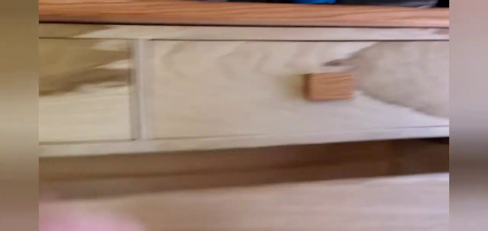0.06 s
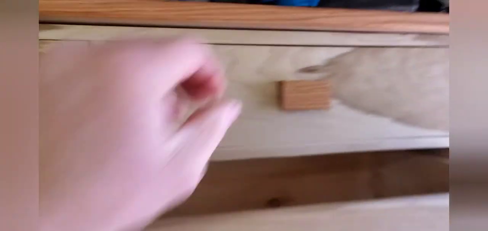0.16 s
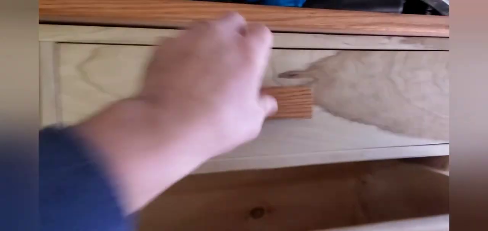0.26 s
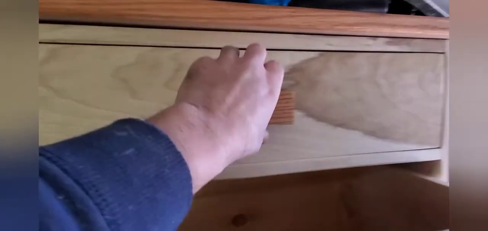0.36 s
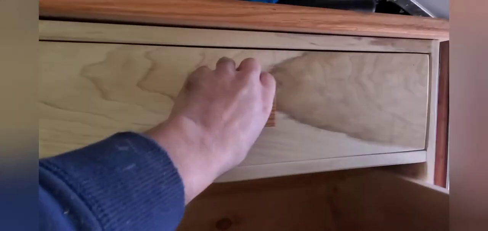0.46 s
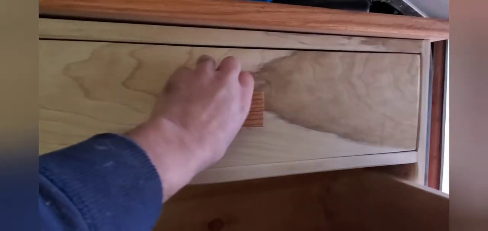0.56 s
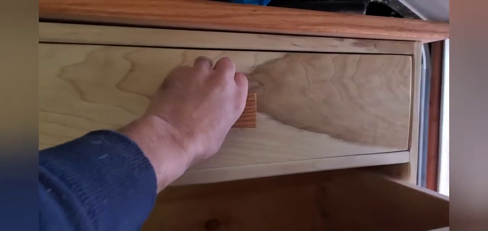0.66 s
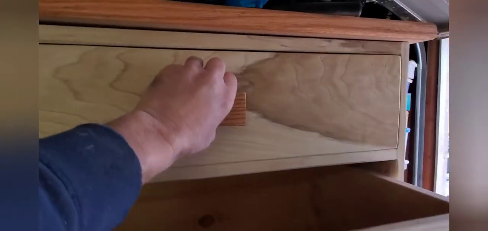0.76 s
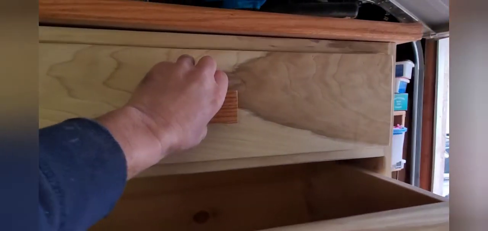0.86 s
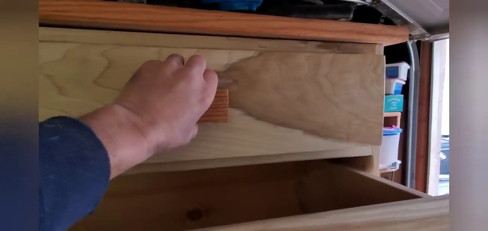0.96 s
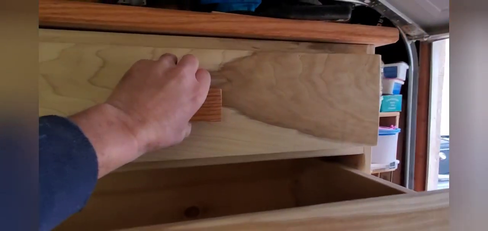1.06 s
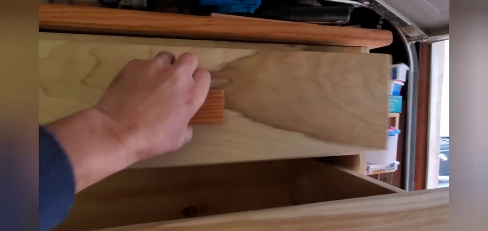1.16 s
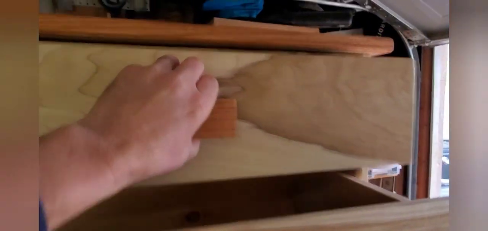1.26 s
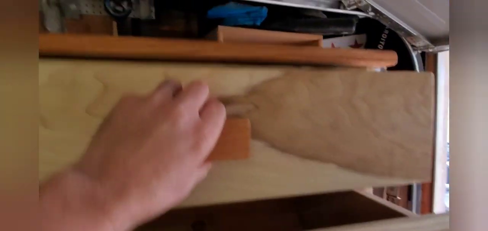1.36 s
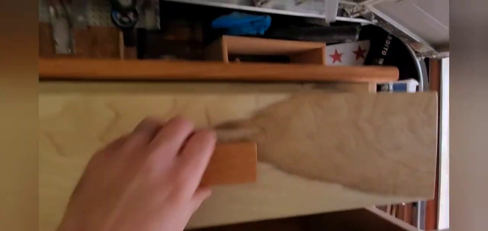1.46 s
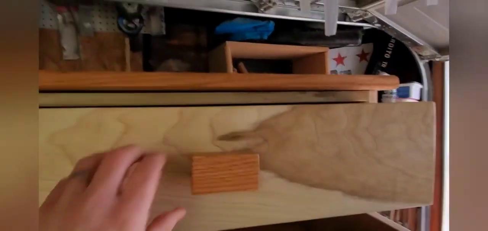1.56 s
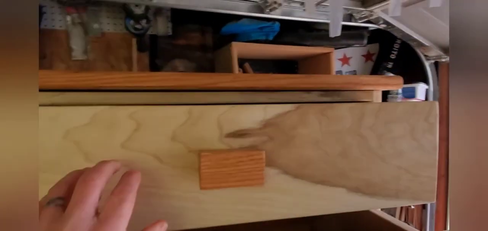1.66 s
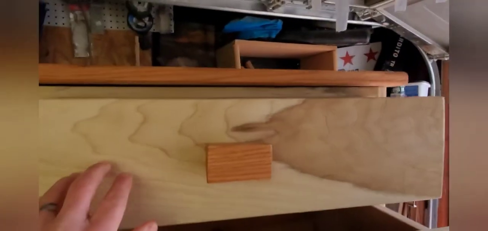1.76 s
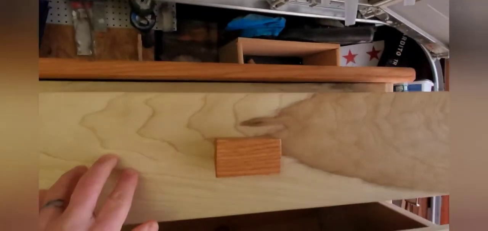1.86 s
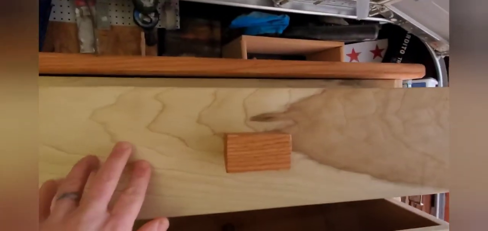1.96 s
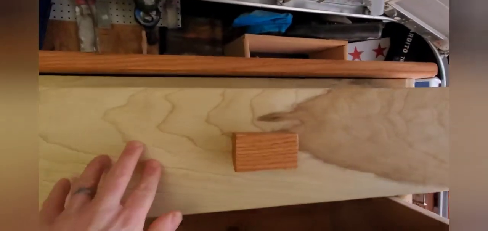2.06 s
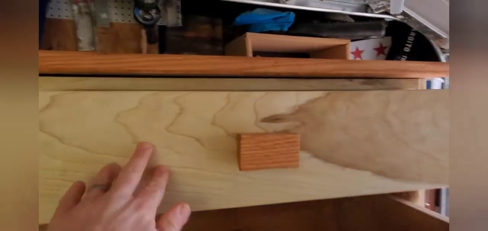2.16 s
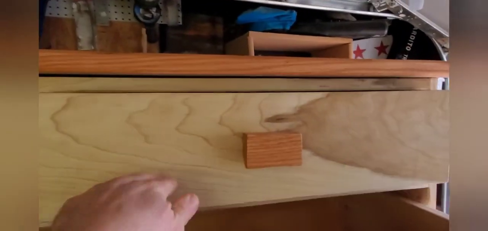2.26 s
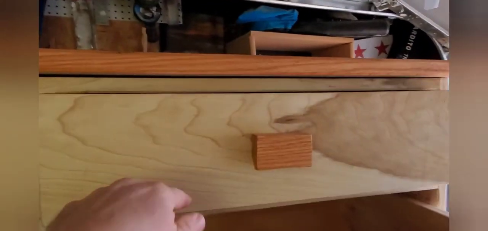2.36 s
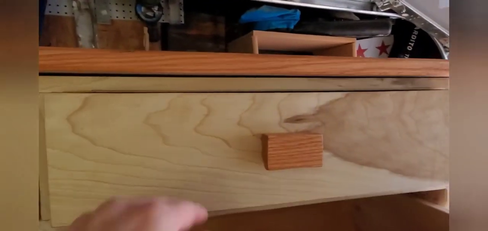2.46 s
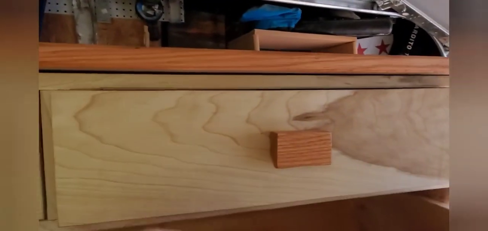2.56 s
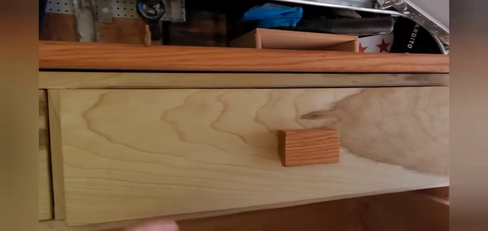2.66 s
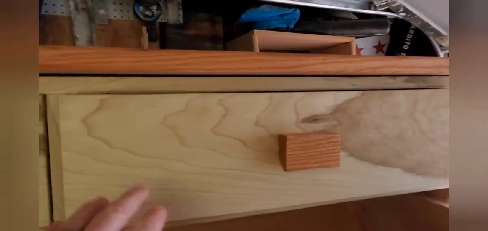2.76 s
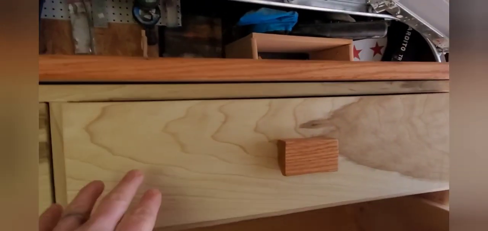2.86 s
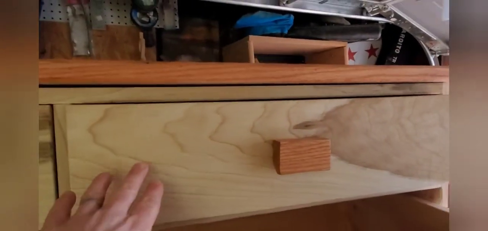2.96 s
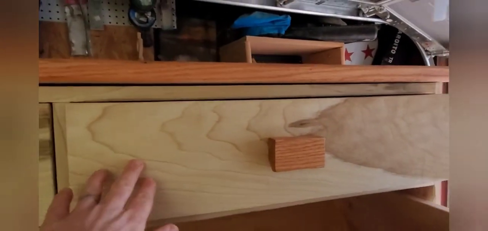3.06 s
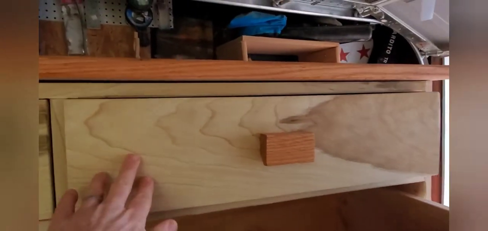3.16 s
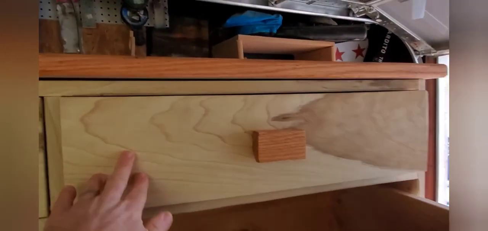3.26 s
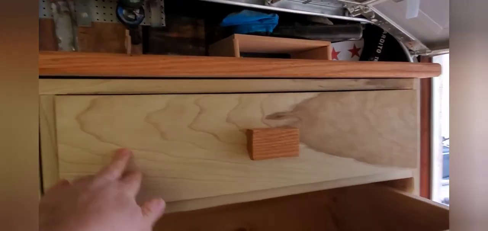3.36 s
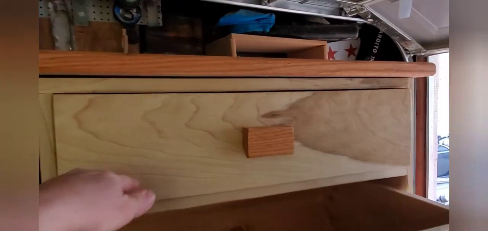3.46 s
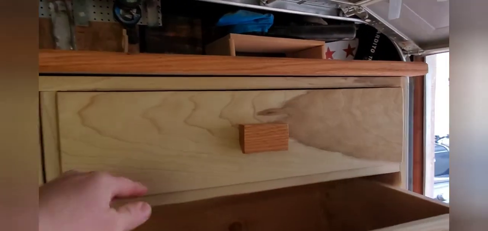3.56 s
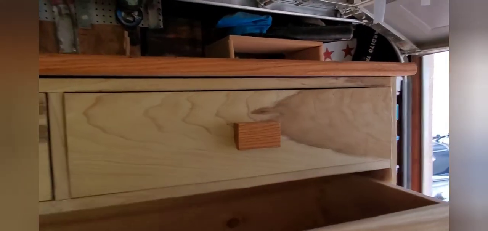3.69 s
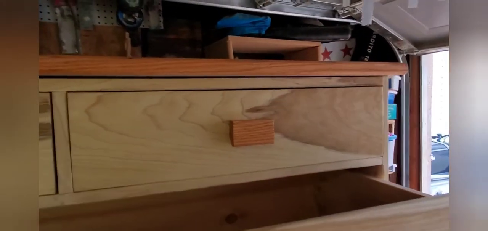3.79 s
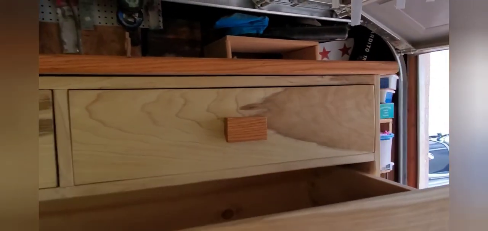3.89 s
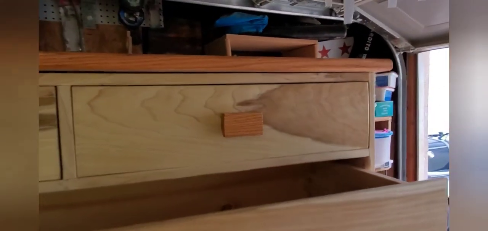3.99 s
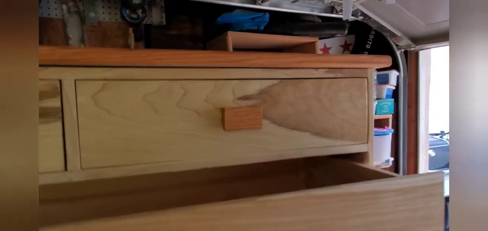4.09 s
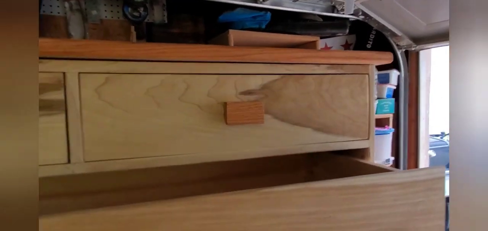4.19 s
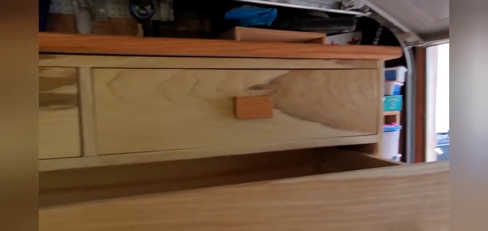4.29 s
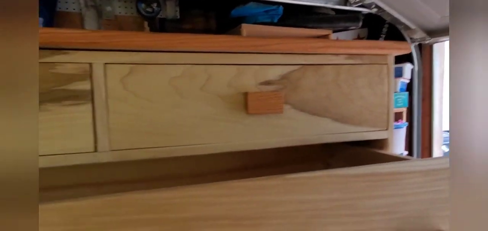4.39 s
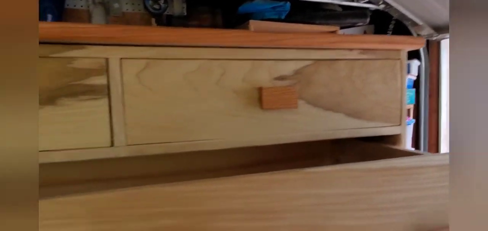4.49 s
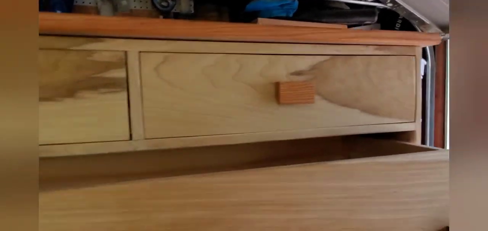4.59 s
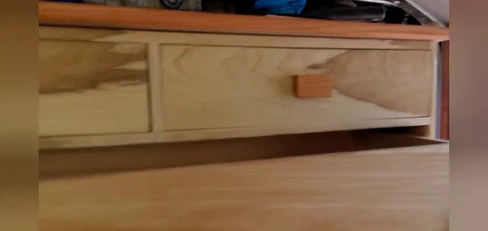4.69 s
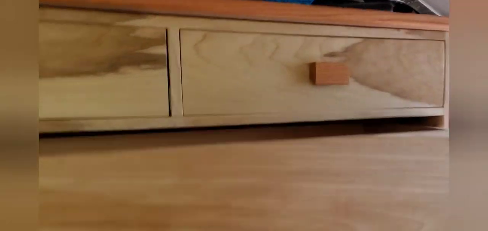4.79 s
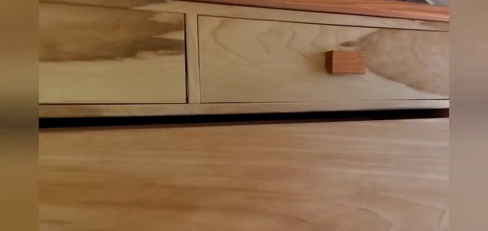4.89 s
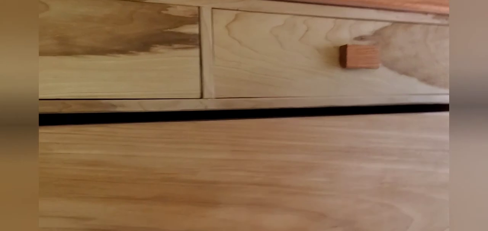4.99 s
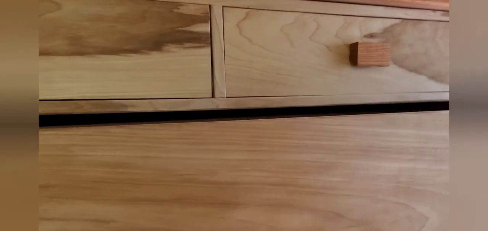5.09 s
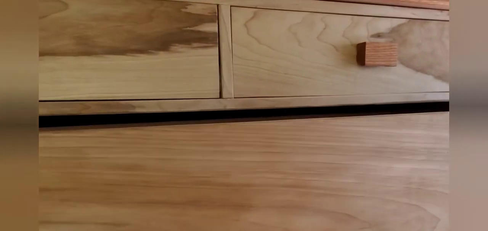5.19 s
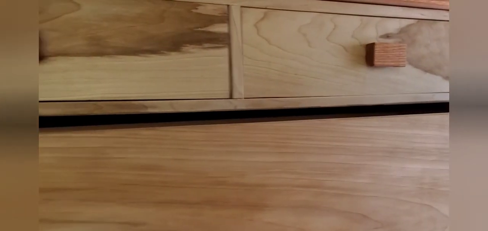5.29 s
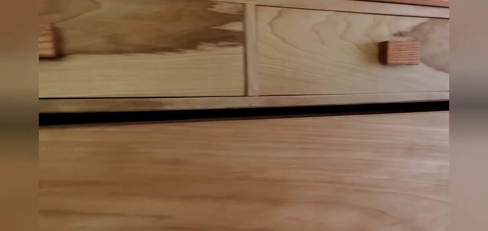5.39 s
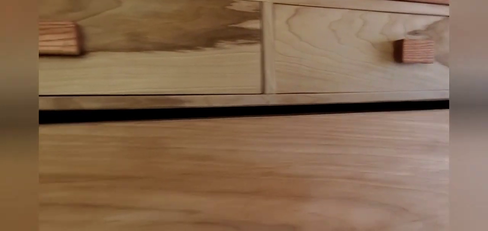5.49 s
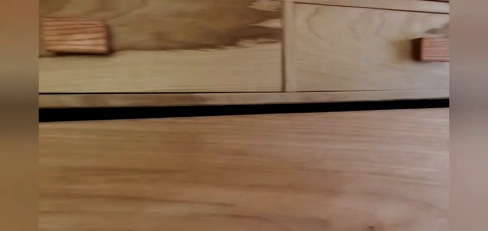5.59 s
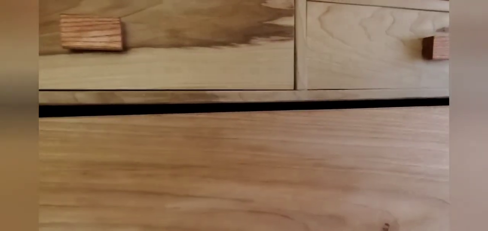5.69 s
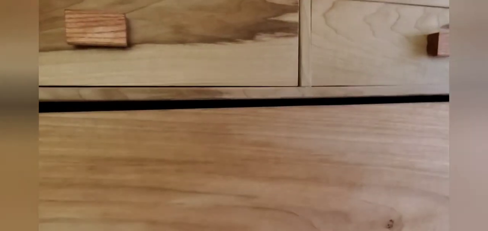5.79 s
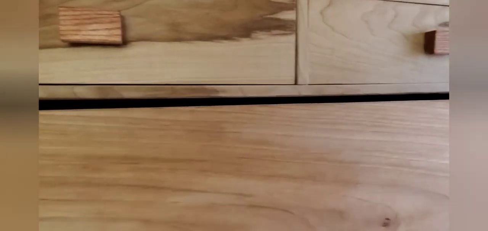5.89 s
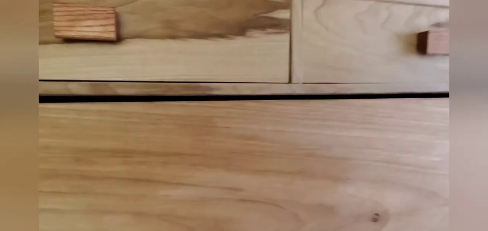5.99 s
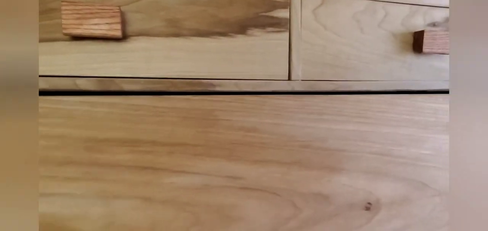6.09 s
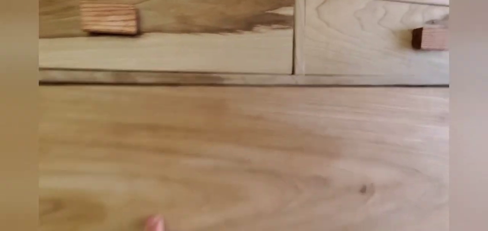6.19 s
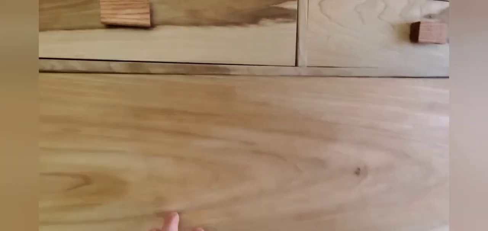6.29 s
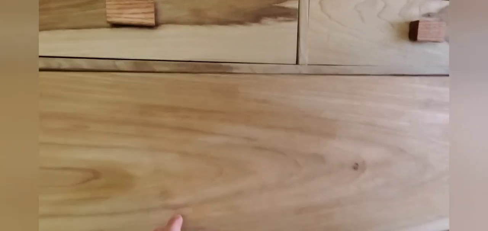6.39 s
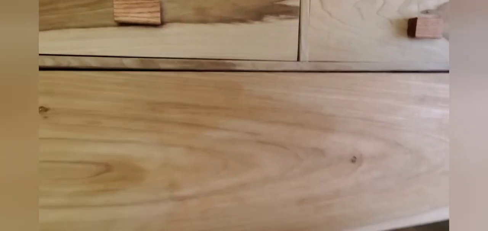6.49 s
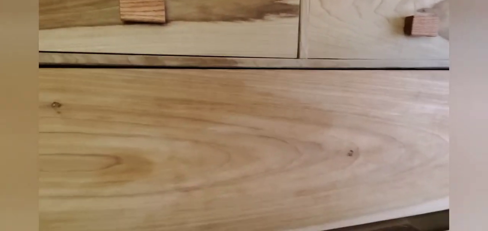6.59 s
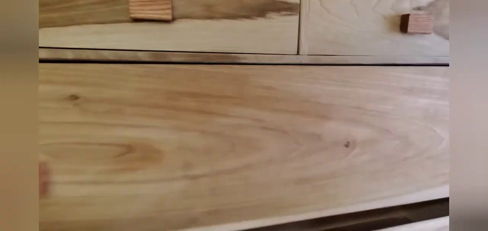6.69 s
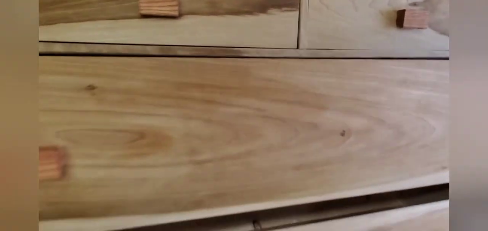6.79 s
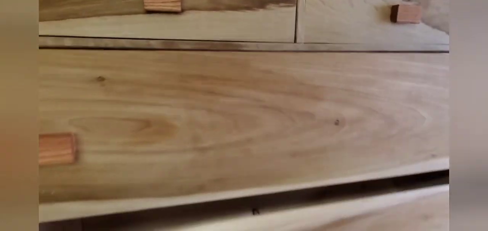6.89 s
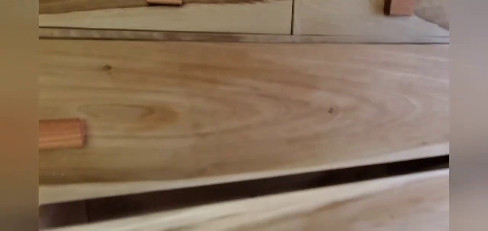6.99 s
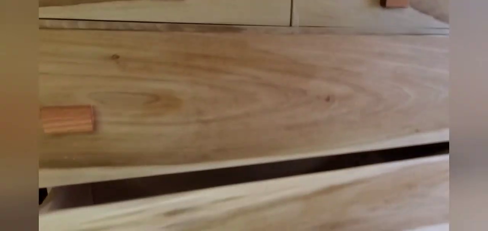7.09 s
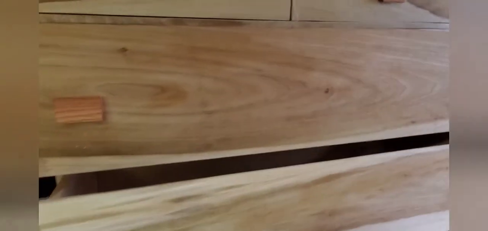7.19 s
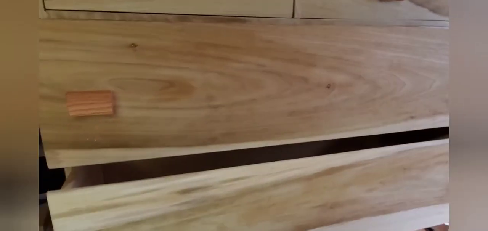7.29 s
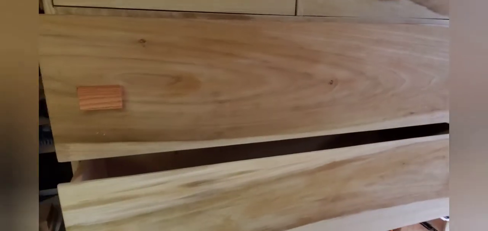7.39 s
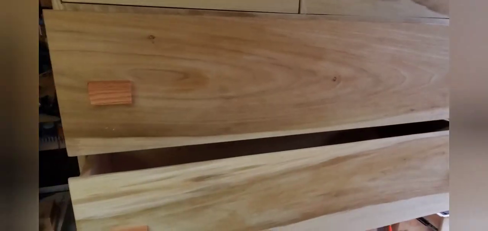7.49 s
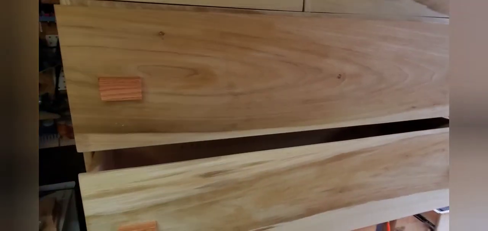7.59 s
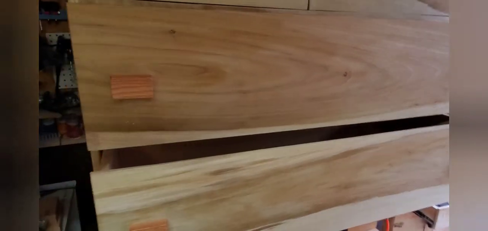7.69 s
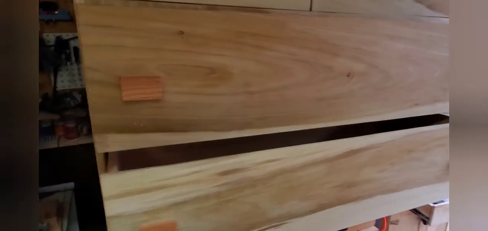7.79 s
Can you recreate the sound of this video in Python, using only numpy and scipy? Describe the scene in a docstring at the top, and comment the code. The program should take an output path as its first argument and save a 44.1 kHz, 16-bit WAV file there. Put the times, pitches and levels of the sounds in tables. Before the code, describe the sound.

Wood rubs on wood: a top drawer jerks open with boxy booms, panel rattles and clicks, pauses, then shoves back and knocks home. Afterwards it is quieter, with low bumps from the moving handheld microphone, faint squeaks and short shoe scuffs. Two heavier drawers then close with soft low rubs and a sharp scrape, close up in a short-echo workshop.

```python
"""In a workshop, wooden drawers of a dresser are pulled and pushed on wooden runners, close to a handheld camera.
A small top drawer slides out, back in and knocks home; then two wide lower drawers are pushed shut.
The strokes are random friction clicks ringing box and panel modes; knocks add a click and a thud.
Gliding narrow noise makes squeals and rubbing resonances; coloured grains make sole scuffs and rustling clothing.
Filtered noise makes the low rumble; random reflections make the room."""
import sys
import numpy as np
from scipy import signal
from scipy.fft import rfft, irfft
from scipy.io import wavfile
from scipy.ndimage import uniform_filter1d

SR = 44100
rng = np.random.default_rng(int(sys.argv[2]) if len(sys.argv) > 2 else 0)


def inscribe(sig):
    """Save sig as 16-bit PCM at rate SR to the path in sys.argv[1].

    A 1-D sig is mono; a 2-D sig holds one channel per row.
    Samples are clipped to [-1, 1] before scaling.
    """
    pcm = np.round(np.clip(np.atleast_2d(sig).T, -1, 1) * 32767)
    wavfile.write(sys.argv[1], SR, pcm.astype(np.int16))


N = 346185
TIME = np.arange(N) / SR  # s

# modes of the top drawer's box: pitch_hz, relative level_db, t60_s
TOP_BOX = [(44.8, -33, 0.074), (81.4, 3.5, 0.19), (101.2, -3.5, 0.27), (121.7, -5, 0.2), (158.5, -1, 0.19),
           (183.7, -5, 0.27), (232, -1, 0.065), (268, -5, 0.056), (318, -8.5, 0.067), (363, -22.5, 0.019),
           (438, -26, 0.098)]
# modes of the thin side and bottom panels: pitch_hz, relative level_db, t60_s
PANELS = [(324.1, 3, 0.33), (374, -29, 0.074), (446, -18, 0.05), (546.6, 6, 0.18), (596, 1, 0.21),
          (710, -10, 0.071), (897.5, 7.5, 0.084), (1006, 9.5, 0.08), (1203, -0.5, 0.067), (1313, -4, 0.084),
          (1460, -5, 0.12), (1520, -2, .035), (1757, 3.5, 0.038), (1980, -26, 0.075)]


def slide(start, end, drawer, touch, hollow):
    """A drawer judders along its runners: slips shake the box and its panels, and the grain hisses."""
    # modes of the two lower boxes: pitch_hz, relative level_db, t60_s
    middle_box = [(43.7, -12, 0.25), (71.8, 0, 0.52), (106, -2.5, 0.13), (155, 1.5, 0.13), (205.7, 3, 0.24),
                  (222.4, -7.5, 0.24), (262, 0, 0.17), (290, -18, .12), (352, -7.5, 0.093), (480, -8, 0.04),
                  (640, -20, 0.072), (806, -14, 0.037)]
    bottom_box = [(46.4, -6, 0.16), (80, -11, 0.25), (110.6, 6.5, 0.18), (195, -5.5, 0.13),
                  (232, 3.5, 0.086), (279, -2.5, 0.12), (335, 2, 0.075)]
    # colour of the rubbing runners: frequency_hz, relative level_db (per Hz)
    rub_colour = [(150, -31), (300, 1.5), (450, 5.5), (600, 5), (1000, -2), (1500, -1.5), (2200, -4.5),
                  (2700, -14.5), (3400, -19), (4500, -30.5), (8000, -45.5)]
    # colour of the hissing wood grain: frequency_hz, relative level_db (per Hz)
    grain_colour = [(1500, -27), (2400, -1.5), (3200, -2), (4000, -1.5), (4900, -6.5), (6500, -0.5),
                    (8300, -8), (10000, -7.5), (12500, -7), (15500, -12)]
    box = {"top": TOP_BOX, "middle": middle_box, "bottom": bottom_box}[drawer]
    rub_tilt_db, hiss_tilt_db, panel_db, judder_db = touch
    t = np.arange(start, end, 1 / SR)
    boom, rub, hiss = pushed(t)

    judder = gain_of(judder_db * wobble(len(t), hz=69.4))  # stick and slip modulate every contact at once
    slips = friction(len(t), per_s=2500, spread_db=3.5) * judder
    slips = patchy(slips, patch_db=3, width_bins=3, length_frames=7)
    body = steadied(through(slips, ring(box)), seconds=0.0386)
    scrape = rub * steadied(coloured(slips, rub_colour, rub_tilt_db), seconds=0.048)

    panels = through(rub * steadied(slips, seconds=0.068), ring(PANELS))  # they ring on after each push
    panels *= gain_of(panel_db) * scrape.std() / panels.std()
    if hollow is not None:
        *glide, hollow_db = hollow
        keep = np.exp(-1 / (.02 * SR))  # the enclosed air follows the rub with a 20 ms lag
        air_level = signal.lfilter([1 - keep], [1, -keep], rub)
        panels += gain_of(hollow_db) * air_level * whistle(len(t), *glide)

    fibres = friction(len(t), per_s=9000, spread_db=2) * judder
    grain = steadied(coloured(fibres, grain_colour, hiss_tilt_db), seconds=0.14)
    sound = boom * body + scrape + panels + hiss * grain
    return start, sound * signal.windows.tukey(len(t), .03)


def pushed(t):
    """Levels of boom, rub and hiss: each push builds up, holds and dies away as the drawer slows."""
    # pushes and pulls of the hand, each moving a drawer until it binds:
    # start_s, rise_s, hold_s, fade of the rub (dB per s),
    # boom of the box (dB), rub of the runners (dB), hiss of the wood grain (dB)
    pushes = [ (0.472, 0.043, 0.031, 248, -53.5, -62.5, -73), (0.578, 0.012, 0.048, 170, -47.5, -56, -66.5),
              (0.644, 0.083, 0.018, 300, -70, -50.5, -53), (0.779, 0.0072, 0.019, 225, -37.5, -53.5, -53),
              (0.83, 0.021, 0.044, 37, -46.5, -56, -74.5), (1.075, 0.059, 0.027, 148, -42, -43.5, -57),
              (1.174, 0.013, 0.052, 109, -38.5, -44.5, -55.5), (1.288, 0.015, 0.015, 123, -41, -52.5, -69),
              (1.382, 0.061, 0.025, 195, -49, -58, -62.5), (2.031, 0.1, 0.052, 115, -43, -49, -51),
              (2.186, 0.054, 0.0089, 196, -37.5, -46.5, -68), (2.25, 0.021, 0.023, 425.5, -40, -41, -53.5),
              (2.309, 0.02, 0.018, 303, -39, -47, -63), (2.355, 0.016, 0.012, 328, -35, -66, -84),
              (3.126, 0.019, 0.053, 250, -53, -55.5, -63.5), (3.191, 0.012, 0.004, 380, -40.5, -38, -76),
              (3.237, 0.038, 0.035, 147, -41, -62, -71.5), (3.343, 0.061, 0.017, 225, -42, -50, -62.5),
              (3.429, 0.038, 0.0093, 448, -50, -66.5, -56.5),
              (6.092, 0.2, 0.025, 122.5, -39.5, -56.5, -73.5), (6.21, 0.074, 0.049, 270, -60, -58.5, -65),
              (6.834, 0.027, 0.02, 92, -59, -58, -59), (6.916, 0.049, 0.02, 107, -49.5, -55.5, -61.5),
              (7.022, 0.045, 0.02, 174, -44, -59.5, -79), (7.065, 0.049, 0.011, 127, -57, -53.5, -60.5), ]
    fade_ratios = [0.82, 1, 1.1]  # boom, rub, hiss: the boom lingers, the hiss goes first
    power = np.zeros((3, len(t)))
    for start, rise, hold, fade_db, *levels_db in pushes:
        attack = np.sin(np.pi / 2 * np.clip((t - start) / rise, 0, 1)) ** 2
        release_db = -fade_db * np.maximum(t - start - rise - hold, 0)
        level = gain_of(np.c_[levels_db] + np.outer(fade_ratios, release_db))
        power += (attack * level) ** 2
    return np.sqrt(power)


def knock(s, click_db, panel_db, thud_db):
    """A hard contact clicks, rings the panels and, with its slower push, thuds the box."""
    # colour of the hard contact: frequency_hz, relative level_db (per Hz)
    click_colour = [(300, -22), (900, -8), (1300, -5.5), (1900, 2.5), (2700, -13), (4000, -20), (5000, -29),
                    (6700, -18.5), (8500, -26.5), (12000, -25.5), (15500, -57)]
    t = np.arange(SR // 2) / SR
    decay = np.exp(-t / .004) + .28 * np.exp(-t / .025)  # a sharp burst and a weaker tail
    contact = rng.standard_normal((2, len(t))) * decay
    click = coloured(contact, click_colour)
    panel_ring = ring(PANELS)
    panels = np.array([panel_ring, signal.hilbert(panel_ring).imag])  # a quarter cycle apart at the two sides
    push = np.sin(np.pi * np.minimum(t / 0.00388, 1))  # one half-sine of 3.88 ms
    thud = through(push[None], ring(TOP_BOX))  # every knock thuds with the top box's modes
    parts = (click, click_db), (panels, panel_db), (thud, thud_db)
    return s, sum(gain_of(db) * part / abs(part).max() for part, db in parts)


def squeal(s, length, first_hz, last_hz, width_hz, db):
    """Rubbed surfaces sing on one gliding resonance: a fuzzy whistle swells and fades."""
    count = int(length * SR)
    return s, gain_of(db) * whistle(count, first_hz, last_hz, width_hz) * np.hanning(count)


def scuff(s, rise, fall, db, tilt_db, drag_db):
    """A sole drags over fine grit, or a sleeve swishes: a short swell of dense grains over a duller rub."""
    # colour of the fine grains: frequency_hz, relative level_db (per Hz)
    grit_colour = [(150, -28), (400, -24), (700, -16.5), (1000, -9.5), (1300, -4), (2100, -2.5),
                   (3500, -6.5), (5200, -14.5), (6600, -11.5), (8200, -20), (10000, -15.5), (12500, -16.5),
                   (15500, -24.5)]
    # colour of the dull drag: frequency_hz, relative level_db (per Hz)
    drag_colour = [(100, 3.5), (250, -5.5), (600, 0.5), (1000, 4), (2000, -23.5), (6000, -38)]
    t = np.arange(-min(s, .2), .25, 1 / SR)  # 0 at the loudest
    shape = np.where(t < 0, abs(t / rise) ** 3, abs(t / fall) ** 2.0)
    swell = np.exp(-.5 * shape)
    grit = friction(len(t), per_s=9000, spread_db=-1.0) * gain_of(0.49 * wobble(len(t), hz=90))
    grit = patchy(grit, patch_db=2.2, width_bins=4, length_frames=12)
    drag = gain_of(drag_db) * evened(coloured(grit, drag_colour))
    sound = evened(coloured(grit, grit_colour, tilt_db)) + drag
    return s + t[0], gain_of(db) * swell * sound


def background():
    """Low rumble and the soft rustle of a sleeve; both swell with each shift of the body."""
    # shifts of the body that holds the camera:
    # middle_s, half_length_s, handling rumble (dB), rustle of clothing (dB)
    moves = [(0.208, 0.34, -71, -63.5), (2.95, 1, -56, -88), (3.602, 0.23, -54.5, -89),
             (4.022, 0.48, -59, -71), (5.02, 0.29, -71, -71), (5.26, 0.19, -55.5, -76.5),
             (5.982, 0.048, -54.5, -74.5), (6.297, 0.46, -52, -88), (6.78, 0.27, -72, -65),
             (7.51, 0.55, -56, -72)]
    # colour of the low rumble: frequency_hz, relative level_db (per Hz)
    rumble_colour = [(15, -31.5), (30, -8), (50, -1), (78, 1.5), (110, -6), (150, -13.5), (220, -15.5),
                     (320, -24.5), (520, -36), (1500, -68.5)]
    # colour of the clothing: frequency_hz, relative level_db (per Hz)
    cloth_colour = [(200, -3.5), (400, 2), (750, -5.5), (1300, -4.5), (2100, -8.5), (3300, -12),
                    (4800, -20), (6500, -17), (8300, -26), (12000, -18), (15500, -22.5)]
    still_rumble_db, still_rustle_db = -64, -80.5  # between the moves
    power = gain_of(np.c_[[still_rumble_db, still_rustle_db]]) ** 2
    for s, half_length, *levels_db in moves:
        swell = np.exp(-2 * ((TIME - s) / half_length) ** 2)
        power = power + gain_of(np.c_[levels_db]) ** 2 * swell
    handling, rustle = np.sqrt(power)

    rumble = coloured(rng.standard_normal((2, N)), rumble_colour, size=8192)
    rumble = steadied(rumble, seconds=0.18)
    cloth = evened(coloured(friction(N, per_s=12000, spread_db=1.5), cloth_colour))
    flutter = gain_of(1.2 * wobble(N, hz=12))
    return leaned(rumble * handling, right_db=4.0) + leaned(cloth * rustle * flutter, right_db=2.5)


def workshop(x, wet_db):
    """Adds the room: the sound turns steadily between two sets of reflections as the camera moves."""
    turn = 2 * np.pi * .7 * TIME  # 0.7 turns per s
    tail = through(x * np.cos(turn), echoes(delay=.006)) + through(x * np.sin(turn), echoes(delay=.009))
    return x + gain_of(wet_db) * tail


def echoes(delay):
    """A left and a right train of random reflections of energy 1, each band dying at its own speed."""
    # decay of the room: frequency_hz, t60_s
    room_decay = [(100, 0.16), (500, 0.43), (2000, 0.2), (6000, 0.22), (15000, 0.27)]
    hz, t, z = signal.stft(rng.choice([-1., 1.], (2, SR // 2)), SR, nperseg=256)
    fade = gain_of(-60 * t / read(room_decay, hz)[:, None])
    tail = signal.istft(z * fade, SR, nperseg=256)[1]
    tail = np.pad(tail, ((0, 0), (int(delay * SR), 0)))
    return tail / np.linalg.norm(tail, axis=1, keepdims=True)


def friction(count, per_s, spread_db):
    """Tiny catches of two surfaces: random clicks of uneven size, each reaching the two sides with its own sign."""
    chance = rng.random(count)
    size = rng.exponential(1, count)
    sign = rng.choice([-1, 1], (2, count))
    return evened((chance < per_s / SR) * sign * gain_of(spread_db * np.minimum(size, 4)))


def patchy(x, patch_db, width_bins, length_frames):
    """The point of contact wanders, so narrow bands swell and fade for moments."""
    z = signal.stft(x, nperseg=1024, noverlap=768)[2]
    field = rng.standard_normal(z.shape[1:])
    for _ in range(2):
        field = uniform_filter1d(field, width_bins, axis=0)
        field = uniform_filter1d(field, length_frames, axis=1)
    y = signal.istft(z * gain_of(patch_db * evened(field)), nperseg=1024, noverlap=768)[1]
    return evened(y[:, :x.shape[1]])


def whistle(count, first_hz, last_hz, width_hz):
    """Rubbing feeds one gliding resonance: a fuzzy tone of rms 1."""
    glide_hz = np.linspace(first_hz, last_hz, count)
    turn = np.exp(2j * np.pi * np.cumsum(glide_hz) / SR)
    lowpass = signal.butter(2, width_hz / 2, fs=SR, output="sos")
    band = signal.sosfilt(lowpass, rng.standard_normal((2, count)) / turn)
    return evened((band * turn).real)


def ring(modes):
    """Response of a set of damped modes to one tap; their signs alternate."""
    t = np.arange(SR // 2) / SR
    response = np.zeros(len(t))
    for k, (hz, db, t60) in enumerate(modes):
        response += (-1) ** k * gain_of(db - 60 * t / t60) * np.sin(2 * np.pi * hz * t)
    return response


def wobble(count, hz):
    """Smooth random motion of rms 1, up to about hz."""
    f = np.fft.rfftfreq(count, 1 / SR)
    slow = np.exp(-(f / hz) ** 2) * (f > 0)
    return evened(irfft(rfft(rng.standard_normal(count)) * slow, count))


def coloured(x, points, tilt_db=0, size=2048):
    """Causal (minimum-phase) filter with the given spectrum, tilted by about tilt_db per octave above 1 kHz."""
    hz = np.fft.rfftfreq(size, 1 / SR)
    level_db = read(points, hz) + tilt_db * np.log2(1 + hz / 1000)
    cepstrum = irfft(np.log(gain_of(level_db)))
    cepstrum[1:size // 2] *= 2  # folding the cepstrum puts the energy first
    cepstrum[size // 2 + 1:] = 0
    return through(x, irfft(np.exp(rfft(cepstrum))))


def through(x, response):
    """Passes each channel through an impulse response."""
    return signal.fftconvolve(x, np.atleast_2d(response), axes=1)[:, :x.shape[1]]


def gain_of(db):
    """Decibels to amplitude."""
    return 10 ** (np.asarray(db) / 20)


def evened(x):
    """Scales to rms 1."""
    return x / np.sqrt(np.mean(x ** 2) + 1e-20)


def steadied(x, seconds):
    """Scales to rms 1 over a sliding window, which keeps only the quick flutter."""
    return x / np.sqrt(abs(uniform_filter1d(x ** 2, int(seconds * SR))) + 1e-20)


def read(points, hz):
    """Joins (Hz, value) points on a log-frequency axis."""
    f, value = np.transpose(points)
    return np.interp(np.log(hz + 1), np.log(f + 1), value)


def leaned(x, right_db):
    """Places a source to the right: the right side is right_db louder than the left."""
    return x * gain_of(np.array([[-.5], [.5]]) * right_db)


def add(mix, s, sound):
    """Mixes a two-channel sound in at time s."""
    part = mix[:, max(round(s * SR), 0):][:, :sound.shape[1]]
    part += sound[:, :part.shape[1]]


def scene():
    """Drawers, knocks, feet and a sleeve in the workshop; table levels are ahead of room and placement."""
    # whole travels of a drawer: start_s, end_s, box,
    # (rub tilt (dB per octave), hiss tilt (dB per octave), panel ring (dB against the rub), judder depth (dB)),
    # hollow behind the top drawer, changing pitch as it travels:
    strokes = [ (0.48, 1.621, "top", (-2.2, -4.5, -7, 2), (862, 690, 269, -6.5)),
               (2.03, 2.561, "top", (1.5, -1.5, -6, 0), (476, 626, 48, -2.5)),
               (3.109, 3.581, "top", (-2.4, -2, -5, -0.5), (573, 594, 53, -29)),
               (6.08, 6.559, "middle", (-11, 0.5, -13, 0), None),
               (6.829, 7.349, "bottom", (7.5, -5, -18, -0.8), None), ]
    # knocks of wood on wood: start_s, click peak (dB), panel ring peak (dB), box thud peak (dB)
    knocks = [(0.588, -55, -47.5, -43), (.787, -29, -48, -39), (.848, -38, -41.5, -51),
              (1.102, -52.5, -45, -35.5), (1.15, -35, -34.5, -36), (1.19, -33.5, -36.5, -42),
              (1.306, -41, -31.5, -46.5), (1.848, -42.5, -59, -61), (2.156, -37.5, -37.5, -36),
              (2.262, -34, -38, -45), (2.32, -35, -34.5, -52), (2.349, -35, -49, -50),
              (3.135, -39.5, -64, -54), (3.189, -32, -59, -58), (3.197, -32, -50, -50),
              (3.206, -61, -31, -39), (3.379, -54, -45, -31.5), (3.389, -53, -39, -36),
              (3.447, -38.5, -61, -45), (3.714, -44, -67, -55), (4.152, -73, -57.5, -48.5),
              (4.726, -53.5, -82, -69), (6.851, -44.5, -71, -58), (7.072, -58, -43.5, -46),
              (7.774, -74, -71, -52.5)]
    # squeals and resonances of rubbed surfaces, from faint whistles to the loud rub at 6.6 s:
    # start_s, length_s, first_hz, last_hz, width_hz, level_db
    squeals = [(1.373, 0.15, 11900, 12500, 1510, -60.5), (2.052, 0.15, 9550, 9800, 2500, -57.5),
               (4.006, 0.24, 2150, 1840, 240, -78), (4.169, 0.2, 1700, 1500, 260, -76),
               (4.19, 0.33, 1390, 1170, 191, -75.5), (6.541, .11, 1450, 1650, 454, -44.5),
               (6.555, .11, 2700, 2880, 700, -47.5)]
    # scuffs of soles, and one faint bright swish of a sleeve (5.73 s):
    # loudest_s, rise_s, fall_s, grit level_db, grit tilt (dB per octave), dull drag (dB against the grit)
    scuffs = [(0.06, 0.041, 0.029, -53, -1, -50), (.725, 0.055, 0.027, -44.5, 0.5, -9.5),
              (1.79, 0.046, 0.04, -56.5, -3.5, -36), (1.972, 0.037, 0.023, -45.5, 1.5, -7.5),
              (3.742, 0.028, 0.053, -61, 0.5, -38), (4.748, 0.022, 0.03, -60.5, -0.5, -48),
              (5.178, 0.025, 0.02, -59.5, -2, -16), (5.322, 0.026, 0.029, -40.5, -1.9, -16),
              (5.73, 0.089, 0.13, -77.5, 9, -28), (6.588, 0.037, 0.024, -49, -5.5, -9.5),
              (6.628, 0.024, 0.015, -44.5, -4, -3.5), (7.57, 0.03, 0.021, -48, -0.9, -8)]
    wood, feet = np.zeros((2, 2, N))
    for row in strokes:
        add(wood, *slide(*row))
    for row in knocks:
        add(wood, *knock(*row))
    for row in squeals:
        add(wood, *squeal(*row))
    for row in scuffs:
        add(feet, *scuff(*row))
    drawers = leaned(workshop(wood, wet_db=-11.0), right_db=1.0)
    steps = leaned(workshop(feet, wet_db=-7.0), right_db=1.5)
    return drawers + steps + background()


def record(dry):
    """Two close microphone ports that share the bass but differ in colour; their faint hiss; the band limit."""
    # likeness of the two ports: frequency_hz, left-right likeness (0 to 1)
    likeness = [(60, .982), (150, .98), (300, .92), (600, .78), (1000, .3), (1500, .08), (15000, .03)]
    # colour difference of the ports: frequency_hz, left minus right (dB)
    port_colour = [(60, -1.4), (170, -1.8), (350, -3.2), (700, -4.8), (1100, -8), (1800, -10), (3000, -8.8),
                   (4900, -2.5), (6200, -8), (7300, -7.5), (8300, 1), (9800, 0), (12500, -5), (15000, -3)]
    hiss_db, edge_hz = -84, 15750  # hiss ahead of the band limit
    hz = np.fft.rfftfreq(N, 1 / SR)
    left, other = rfft(dry)
    same = np.clip(read(likeness, hz), 0, 1)
    pair = np.array([left, same * left + np.sqrt(1 - same ** 2) * other])
    ported = irfft(pair * gain_of(np.outer([.5, -.5], read(port_colour, hz))), N)
    noisy = ported + gain_of(hiss_db) * rng.standard_normal((2, N))
    lowpass = signal.firwin(511, edge_hz, window=("kaiser", 9), fs=SR)
    return signal.oaconvolve(noisy, lowpass[None], "same")


dry = scene()
out = record(dry)
inscribe(out)
```